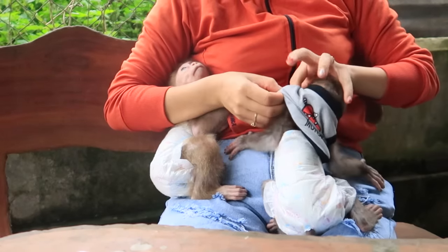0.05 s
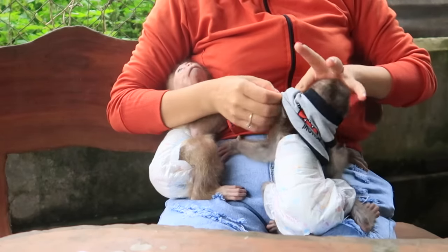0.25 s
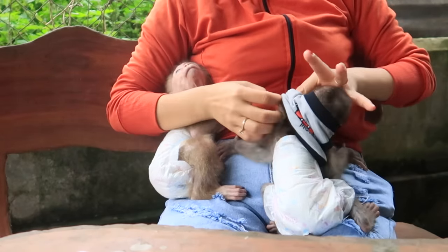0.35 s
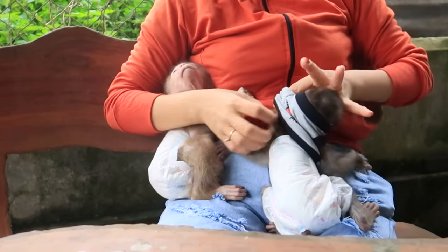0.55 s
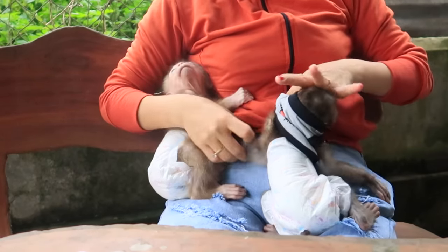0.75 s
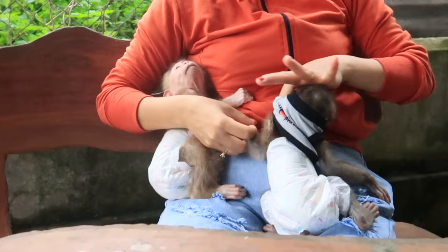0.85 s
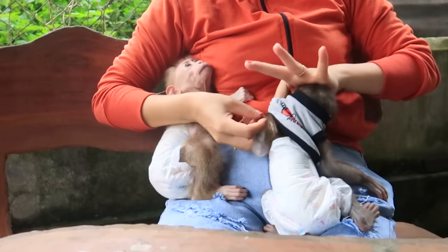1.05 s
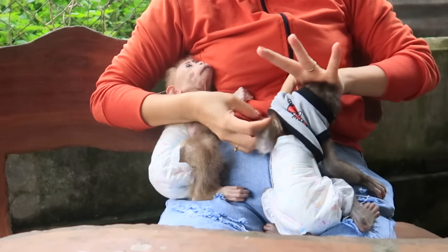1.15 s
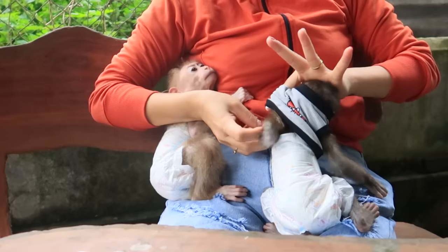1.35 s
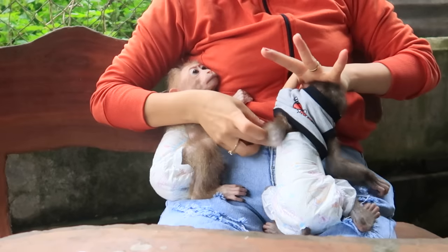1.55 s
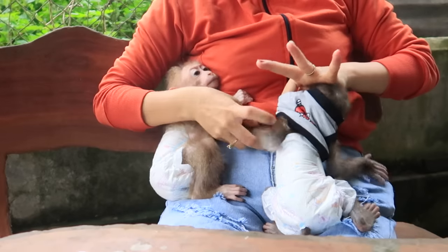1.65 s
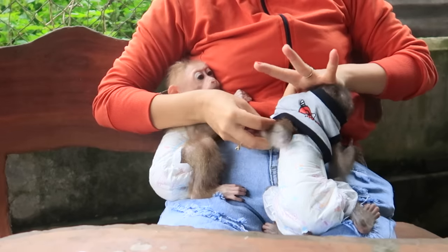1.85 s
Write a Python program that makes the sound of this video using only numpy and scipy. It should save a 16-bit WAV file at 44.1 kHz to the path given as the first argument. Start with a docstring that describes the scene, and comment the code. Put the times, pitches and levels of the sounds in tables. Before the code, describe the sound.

Close stereo pickup of a baby monkey: quick rough chirp, steady whine, shrill rising squeal and sudden fall, with fabric rubbing, rumble and hiss, then near quiet with slight ringing and a faint distant swell.

```python
"""Indoors, close on a baby monkey being dressed. Rumble, a murky drone, soft hiss and faint hum lie
underneath from the start while cloth ticks and rubs. A short rasping chirp comes first, then a thin whine
that breaks into a squeal, sweeps up to a very high whistle and plunges back; rumble, drone and hiss drop
away as it ends, and a faint, dull, distant swell follows. Voices are summed partials on moving pitches;
cloth, air and swell are shaped noise; hard walls ring a little, heard by two microphone ports."""
import sys
import numpy as np
from scipy import signal
from scipy.fft import rfft, irfft
from scipy.io import wavfile

SR = 44100
rng = np.random.default_rng(int(sys.argv[2]) if len(sys.argv) > 2 else 0)


def bounce(signal):
    """Save signal as a 16-bit WAV file at the path given by the first command-line argument."""
    frames = np.transpose(np.atleast_2d(signal))
    limited = np.clip(frames, -1, 1)
    pcm = np.round(limited * 32767).astype(np.int16)
    wavfile.write(sys.argv[1], SR, pcm)


N = 83790
T = np.arange(N) / SR  # time of each sample, s
BIN_HZ = np.arange(N // 2 + 1) * SR / N

# Background levels before trim: t/s, rumble level/dB, murk level/dB, hiss level/dB
BACKGROUND_LEVELS = [(0.0, -26, -40, -39), (0.042, -30, -36, -40.5), (0.184, -28, -40, -43.5),
                     (0.254, -39.5, -44.5, -42), (0.39, -33.5, -44.5, -48), (0.464, -41, -40, -52),
                     (0.512, -35.5, -42, -47), (0.592, -49.5, -43.5, -51), (0.746, -38.5, -42.5, -42),
                     (0.84, -54, -41.5, -47.5), (0.978, -41, -51, -50), (1.158, -61, -50.5, -51),
                     (1.286, -52, -55.5, -52.5), (1.312, -79, -62.5, -68), (1.624, -84, -69, -59),
                     (1.9, -83, -65, -60.5)]
# Relative noise colours of the background layers: f/Hz, level/dB
RUMBLE_COLOUR = [(15, -5), (30, -18), (42, -23), (52, 14.5), (65, 2.5), (105, 2.5), (160, -25.5),
                 (400, -72)]
MURK_COLOUR = [(60, -35.5), (110, -8.5), (150, 4.5), (200, -2.5), (280, 0), (400, -11), (800, -18.5),
               (2000, -58)]
HISS_COLOUR = [(100, -18), (300, -3), (500, 3), (900, 1.5), (1500, -5), (3000, -6), (7000, -22),
               (11000, -75.5)]
# Steady hum tones: f/Hz, level/dB
HUM_TONES = [(155, -77.5), (310, -71.5), (595, -76.5), (892, -72.5), (1190, -70.5)]

# Nearby surfaces, before the room's colour: list of delays t/s, list of level/dB
ECHO_DELAYS_S = [.0052, .0113, 0.056]
ECHO_LEVELS_DB = [-22.5, -20, -28.5]
# Colour of all the reflections: f/Hz, level/dB
ROOM_COLOUR = [(500, -4), (2400, 7), (4000, 1.5), (7000, 2), (13000, -9), (16000, -11.5)]
# Phase lead of the left microphone port over the right for the squeal: f/Hz, lead/rad
PORT_LEAD = [(500, .25), (2400, 0.34), (3500, 1.55), (4300, 1.91), (6000, 2.11), (7700, 2.53),
             (11500, 3.17), (13200, 3.54), (16000, 10)]

# Relative colours of the distant swell and of the handled cloth: f/Hz, level/dB
SWELL_COLOUR = [(300, -10), (600, 3), (1000, 5), (1500, 0), (2500, -3), (5000, -17.5), (10000, -25)]
CLOTH_COLOUR = [(200, 4), (800, 4), (1700, 10.5), (4000, 2.5), (8000, -11.5), (10500, -27), (15000, -41.5)]
# Rubbing cloth: t/s, level/dB
RUB_LEVEL = [(0, -51.5), (.04, -44), (.14, -49), (.43, -51), (.54, -52), (.58, -38), (.78, -45), (.95, -57),
             (1.28, -49.5), (1.32, -65.5), (1.55, -63), (1.68, -64.5), (1.9, -65.5)]
# Cloth ticks, peak envelope before halving: t/s, level/dB
CLOTH_TICKS = [(0.031, -21), (0.045, -23.5), (.064, -27), (0.084, -30), (0.107, -27), (0.13, -41.5),
               (.161, -33.5), (0.369, -39), (.404, -48), (.557, -22), (1.569, -51), (1.612, -61),
               (1.661, -39.5)]

# Voice gestures, levels before trim: t/s, pitch f/Hz, level/dB
CHIRP_GESTURE = [(0.224, 3234, -14.5), (0.226, 3095, -9.5), (0.234, 3172, -14.5), (0.236, 3280, -24.5),
                 (0.24, 3280, -8.5), (0.242, 3235, -44), (0.244, 3630, -11.5), (0.276, 4105, -12),
                 (0.29, 4056, -19.5), (0.296, 3910, -23), (0.298, 4204, -31)]
WHINE_GESTURE = [(0.458, 2121, -19), (0.478, 2233, -15.5), (0.486, 2150, -16), (0.508, 2310, -16),
                 (0.534, 2379, -15.5), (0.55, 2280, -20.5), (0.584, 2345, -17.5), (0.61, 2390, -20.5),
                 (0.638, 2346, -15), (0.668, 2386, -20), (0.696, 2434, -17), (0.738, 2340, -17.5),
                 (0.756, 2350, -13.5), (0.776, 2485, -15), (0.798, 2364, -19.5), (0.834, 2375, -18),
                 (0.846, 2520, -13.5)]
RISE_GESTURE = [(0.848, 3590, -6.5), (0.884, 3370, -20), (0.906, 3805, -7), (0.916, 4460, -11),
                (0.92, 4590, -30), (0.928, 4753, -21.5), (0.942, 4774, -22.5), (0.952, 5587, -21),
                (0.972, 6120, -27.5), (0.992, 6725, -22), (1.002, 6530, -21.5), (1.01, 6960, -29),
                (1.02, 7320, -23.5), (1.038, 8435, -31.5)]
WHISTLE_GESTURE = [(1.04, 11584, -34), (1.054, 12260, -46.5), (1.066, 12570, -28), (1.074, 12564, -30),
                   (1.084, 11030, -23.5), (1.096, 11270, -28), (1.106, 12520, -23), (1.12, 12470, -22),
                   (1.142, 12680, -25), (1.17, 12730, -20.5), (1.188, 13450, -25.5), (1.208, 11840, -17.5)]
FALL_GESTURE = [(1.206, 7970, -22), (1.212, 7730, -19.5), (1.228, 6497, -23), (1.238, 6132, -12),
                (1.26, 6000, -19.5), (1.264, 5514, -24.5), (1.276, 5162, -17.5), (1.284, 4562, -9),
                (1.289, 4200, -3.5), (1.304, 3670, -11), (1.31, 3270, -18.5)]
# Tiny side notes, one gesture each, before trim: t/s, pitch f/Hz, level/dB
PEEP_GESTURES = [
    [(.214, 2960, -36), (.217, 2950, -24.5)],
    [(1.167, 4100, -39), (1.178, 4250, -32.5), (1.188, 4070, -49)],
]
# Relative partials, fundamental first, before throat colour: level/dB
CHIRP_PARTIALS = [0, -44]
WHINE_PARTIALS = [-13, -0.5, -10.5, -14.5]
RISE_PARTIALS = [0, -22, -30, -43]
FALL_PARTIALS = [0, -21, -34]
# Throat colour on every partial above the fundamental: f/Hz, level/dB
THROAT_COLOUR = [(7500, -0.5), (9500, -7.5), (11000, -19.5), (12500, 1.5), (13400, 9.5), (14500, -20),
                 (16000, -15)]
# Roughness of the chirp and of the fall: t/s, roughness 0-1
CHIRP_RASP = [(.224, 0.13), (.238, 0.33), (.254, 0.42), (.264, 0.06), (.278, 0.14), (.298, 0.25)]
FALL_RASP = [(1.206, 0.27), (1.24, 0.05), (1.262, 0.4), (1.28, 0.37), (1.288, 0.12), (1.31, 0)]
# Lift of the whine's fundamental, and of its third partial and up: t/s, level/dB
WHINE_BODY = [(.458, 4), (.56, 6), (.62, 2.5), (.7, 0), (.75, -2.5), (.775, -13.5), (.8, -4), (.82, 8),
              (.845, -0.5)]
WHINE_OPENING = [(.458, -20), (.5, -12.5), (.51, -2.5), (.845, -1.5)]
# Air in the strained squeal: t/s, level/dB before trim; then relative colour f/Hz, level/dB
STRAIN_LEVEL = [(.84, -52.5), (.92, -40), (1.0, -32.5), (1.08, -31), (1.13, -38), (1.2, -34), (1.28, -16),
                (1.31, -57)]
STRAIN_COLOUR = [(1500, -61.5), (2900, -20.5), (3800, -0.5), (6000, -1), (8000, -1), (10300, -3),
                 (12500, -4), (14000, -22.5), (15500, -36)]
# Turbulence around the whistle's pitch: t/s, level/dB
WHISTLE_AIR_LEVEL = [(1.03, -82), (1.06, -34.5), (1.11, -29), (1.14, -26.5), (1.2, -22.5), (1.23, -34),
                     (1.28, -24), (1.3, -64)]
# Cracks of the voice between registers: t/s, level/dB
REGISTER_BREAKS = [(0.848, -16.5), (0.912, -30.5), (1.211, -29.5), (1.261, -33)]


def undb(db):
    """Decibels to gain."""
    return 10 ** (np.asarray(db) / 20)


def curve(rows, axis=1):
    """One column of a timed table, interpolated for every sample."""
    rows = np.array(rows)
    return np.interp(T, rows[:, 0], rows[:, axis])


def spectrum(points):
    """A table over frequency, interpolated along log frequency for every bin."""
    hz, value = np.array(points).T
    return np.interp(np.log(BIN_HZ + 1), np.log(hz), value)


def noise(colour):
    """Coloured noise of rms 1."""
    x = irfft(rfft(rng.standard_normal(N)) * undb(spectrum(colour)), N)
    return x / x.std()


def wide(colour, side_db):
    """Coloured noise in the middle, with a separate noise of opposite sign on the two sides."""
    return noise(colour) + undb(side_db) * noise(colour) * np.array([[1], [-1]])


def wobble(hz):
    """Random motion of spread 1, fading steeply above a given rate."""
    x = irfft(rfft(rng.standard_normal(N)) / (1 + (BIN_HZ / hz) ** 4), N)
    return x / x.std()


def within(rows):
    """True between the first and last time of a table."""
    return (T > rows[0][0]) * (T < rows[-1][0])


def ports(x, lead, pan_db):
    """Two microphone ports hear one source with different phase and level; positive values favour left."""
    turn = np.exp(.5j * lead)
    left = irfft(rfft(x) * turn, N) * undb(pan_db / 2)
    right = irfft(rfft(x) / turn, N) * undb(-pan_db / 2)
    return np.array([left, right])


def hum():
    """Faint steady tones whose phases drift slowly."""
    return sum(undb(db) * np.sqrt(2) * np.sin(2 * np.pi * hz * T + 2.7 * wobble(4)) for hz, db in HUM_TONES)


def background():
    """Low rumble, murky drone and soft hiss are shaped noises on moving levels, over the hum."""
    rumble = wide(RUMBLE_COLOUR, side_db=-46.5) * undb(curve(BACKGROUND_LEVELS) - 3.0)
    murk = wide(MURK_COLOUR, side_db=-28) * undb(curve(BACKGROUND_LEVELS, axis=2) - .5)
    hiss = wide(HISS_COLOUR, side_db=-17.5) * undb(curve(BACKGROUND_LEVELS, axis=3) - 1.46)
    return rumble + murk + hiss + hum()


def reverberant_tail():
    """Diffuse noise from the walls, decaying band by band so that the treble fades first."""
    tail = 0
    for lo, hi in ((300, 5000), (5000, 9000), (9000, 16000)):  # Hz
        bandpass = signal.butter(3, [lo, hi], "band", fs=SR, output="sos")
        band = signal.sosfilt(bandpass, rng.standard_normal(N))
        t60_s = 0.77 / (1.5 + (lo / 11000) ** 2)
        tail = tail + band * undb(-60 * T / t60_s)
    return tail / np.linalg.norm(tail)


def early_reflections():
    """A short dense scatter that starts 3 ms after the direct sound."""
    early = rng.standard_normal(N) * np.exp(-T / 0.018) * (T > .003)
    return early / np.linalg.norm(early)


def room(x):
    """Each channel gets its own tail and scatter, plus shared echoes off nearby surfaces."""
    tail_db, early_db = -19.5, -22  # before the room's colour
    out = []
    for channel in x:
        response = undb(tail_db) * reverberant_tail() + undb(early_db) * early_reflections()
        for delay, db in zip(ECHO_DELAYS_S, ECHO_LEVELS_DB):
            response = response + undb(db) * np.sinc((T - delay) * SR)
        response = irfft(rfft(response) * undb(spectrum(ROOM_COLOUR)), N)[:SR]  # first second
        out.append(signal.fftconvolve(channel, response)[:N])
    return np.array(out)


def distant_swell():
    """A faint, dull, distant swell after the cry: unsteady noise under a bell-shaped envelope."""
    centre_s, width_s, level_db = 1.66, 0.095, -56
    swell = np.exp(-((T - centre_s) / width_s) ** 2)
    return wide(SWELL_COLOUR, side_db=-33) * undb(level_db + 1.3 * wobble(60.6)) * swell


def cloth():
    """Fabric rubs unevenly and ticks as fingers catch it: wide noise with sudden, decaying peaks."""
    decay_s = 0.0028
    ticks = sum(undb(db) / 2 * (T >= s) * np.exp(-abs(T - s) / decay_s) for s, db in CLOTH_TICKS)
    rub = undb(curve(RUB_LEVEL) + 2.5 * wobble(70))
    # The two sides differ more towards the treble (Hz, dB)
    side_gain = undb(spectrum([(500, -20), (1500, -16.5), (4000, -2), (8000, 12)]))
    side = irfft(rfft(noise(CLOTH_COLOUR)) * side_gain, N)
    fabric = noise(CLOTH_COLOUR) + side * np.array([[1], [-1]])
    return fabric * (ticks + rub)


def voice(gesture, partials_db, jitter, shimmer, rasp, gain_db, upper_db=0, body_db=0, half=0):
    """A whistle-like voice of partials: pitch and strength flutter, and rasp shakes them faster."""
    edge_s, flutter_hz, rasp_hz = .0012, 170, 700
    fade_in = np.clip((T - gesture[0][0]) / edge_s + .5, 0, 1)
    fade_out = np.clip((gesture[-1][0] - T) / edge_s + .5, 0, 1)
    hz = curve(gesture) * (1 + jitter * wobble(flutter_hz))
    phase = 2 * np.pi * np.cumsum(hz) / SR + rasp * wobble(rasp_hz)
    # Tones at a half and at one and a half times the pitch
    out = half * (np.sin(phase / 2) + .5 * np.sin(phase + phase / 2))
    for k, db in enumerate(partials_db, 1):
        lift = np.interp(k * hz, *np.array(THROAT_COLOUR).T) if k > 1 else body_db
        level_db = db + lift + upper_db * (k > 2) + 0.46 * k * wobble(57)
        out = out + undb(level_db) * np.sin(k * phase) * (k * hz < SR / 2)
    flutter = np.exp(shimmer * wobble(flutter_hz) - shimmer ** 2)
    shake = flutter * (1 + 0.2 * rasp * wobble(rasp_hz))
    level = undb(curve(gesture, axis=2) + gain_db)
    return np.sqrt(2) * out * fade_in * fade_out * shake * level


def peeps():
    """Two tiny rough notes, one just ahead of the chirp and one during the whistle."""
    return sum(voice(peep, [0], jitter=0.011, shimmer=.2, rasp=0.9, gain_db=-3) for peep in PEEP_GESTURES)


def chirp():
    """A short upward chirp whose rasp swells, clears and partly returns, with half-pitch tones."""
    rasp = curve(CHIRP_RASP)
    return voice(CHIRP_GESTURE, CHIRP_PARTIALS, jitter=.025 * rasp, shimmer=.3 * rasp, rasp=rasp,
                 gain_db=1.0, half=undb(-19.5) * rasp)


def chirp_and_peeps():
    """Chirp and peeps reach the left port slightly later and weaker than the right."""
    lag_s = .00003
    return ports(chirp() + peeps(), -2 * np.pi * BIN_HZ * lag_s, pan_db=-1.5)


def whistle_air():
    """Turbulence follows the whistle's pitch as a narrow noise band, partly different at each port."""
    phase = 2 * np.pi * np.cumsum(curve(WHISTLE_GESTURE)) / SR

    def band():
        """Two slow noises carried on the whistle's sine and cosine."""
        spread_hz = 600  # to either side of the pitch
        return wobble(spread_hz) * np.sin(phase) + wobble(spread_hz) * np.cos(phase)

    strength = undb(curve(WHISTLE_AIR_LEVEL) + 1.1 * wobble(90)) * within(WHISTLE_AIR_LEVEL)
    shared = ports(band(), spectrum(PORT_LEAD), pan_db=0.5)
    separate = undb(-10) * np.array([band(), band()])
    return strength * (shared + separate)


def strained_air():
    """Air hisses unsteadily as the squeal strains."""
    level = undb(curve(STRAIN_LEVEL) + 1.3 * wobble(50) - 3.5)
    return noise(STRAIN_COLOUR) * level * within(STRAIN_LEVEL)


def register_cracks():
    """The voice cracks between registers: noise bursts that swell and die within milliseconds."""
    bursts = sum(undb(db) * np.exp(-abs(T - s) / 0.0023) for s, db in REGISTER_BREAKS)
    return noise([(2000, -16), (3500, 11), (6000, 11.5), (9000, -45.5), (15000, -22)]) * bursts


def squeal():
    """One long cry jumps from whine to rise, whistle and fall, with cracks and hissing air."""
    whine = voice(WHINE_GESTURE, WHINE_PARTIALS, jitter=0.0008, shimmer=0.037, rasp=0.0048, gain_db=0.0,
                  upper_db=curve(WHINE_OPENING), body_db=curve(WHINE_BODY))
    rise = voice(RISE_GESTURE, RISE_PARTIALS, jitter=0.0041, shimmer=0.1, rasp=0.051, gain_db=-.5)
    whistle = voice(WHISTLE_GESTURE, [0], jitter=0.0035, shimmer=0.43, rasp=.15, gain_db=1.5)
    rasp = curve(FALL_RASP)
    fall = voice(FALL_GESTURE, FALL_PARTIALS, jitter=0.032 * rasp, shimmer=0.46 * rasp, rasp=rasp,
                 gain_db=-0.5)
    lead = spectrum(PORT_LEAD)
    leaning_left = ports(whine + rise + register_cracks(), lead, pan_db=1.5)
    near_centre = ports(whistle + fall + strained_air(), lead, pan_db=-0.3)
    return leaning_left + near_centre


def scene():
    """Monkey, cloth and distant swell all ring among the walls, over the background."""
    direct = distant_swell() + cloth() + chirp_and_peeps() + whistle_air() + squeal()
    return background() + room(direct) + direct


def record(dry):
    """The recorder clips at full scale, then cuts steeply above 15.4 kHz."""
    top_cut = signal.ellip(10, .1, 80, 15400, fs=SR, output="sos")
    return signal.sosfilt(top_cut, np.clip(dry, -1, 1))


dry = scene()
out = record(dry)
bounce(out)
```